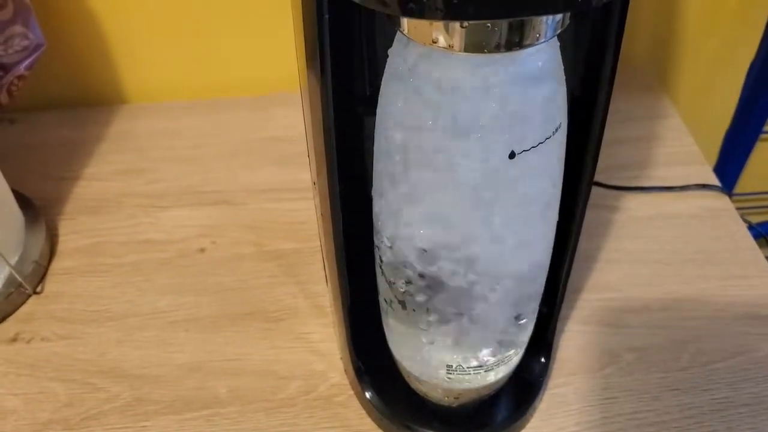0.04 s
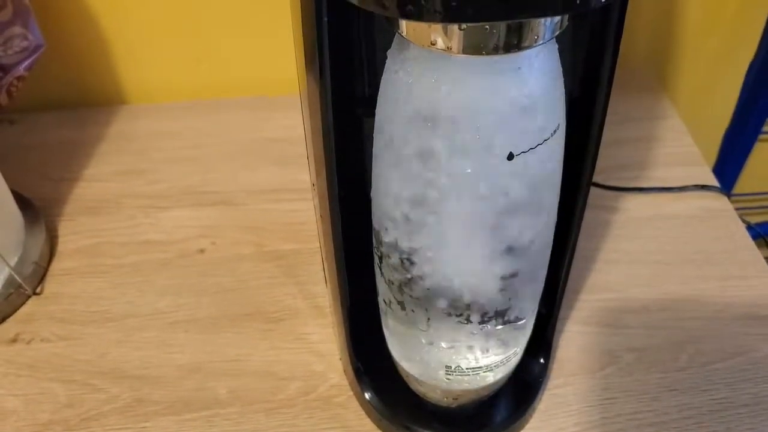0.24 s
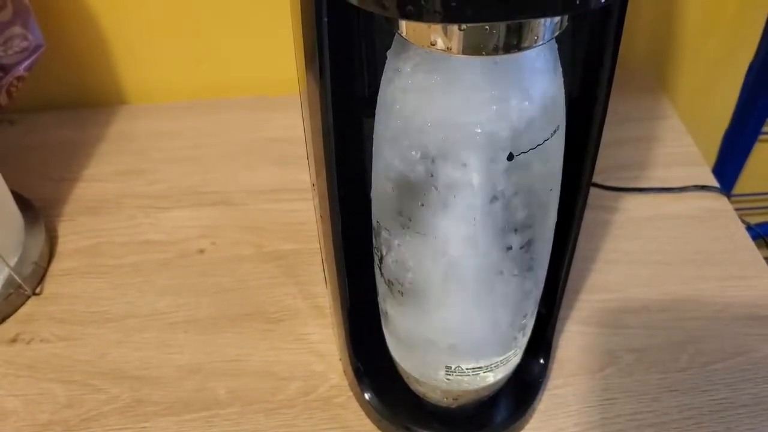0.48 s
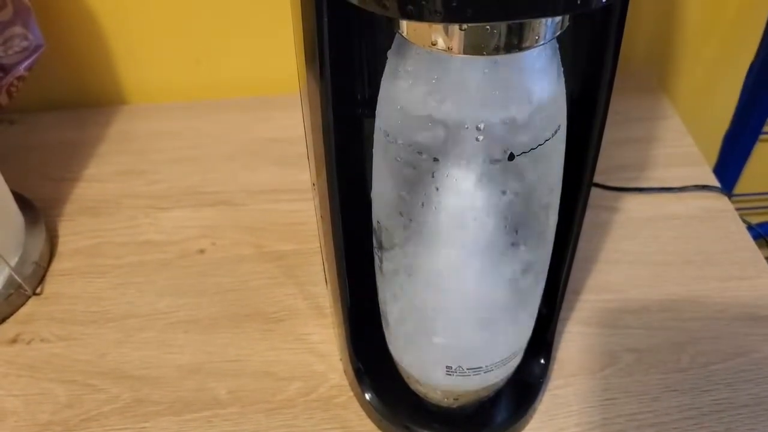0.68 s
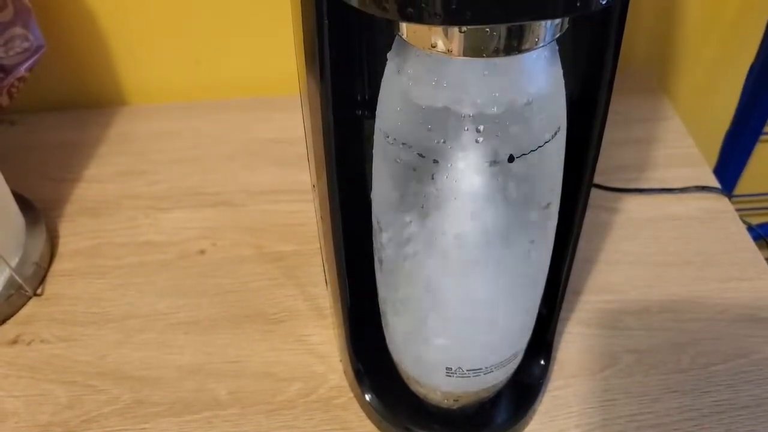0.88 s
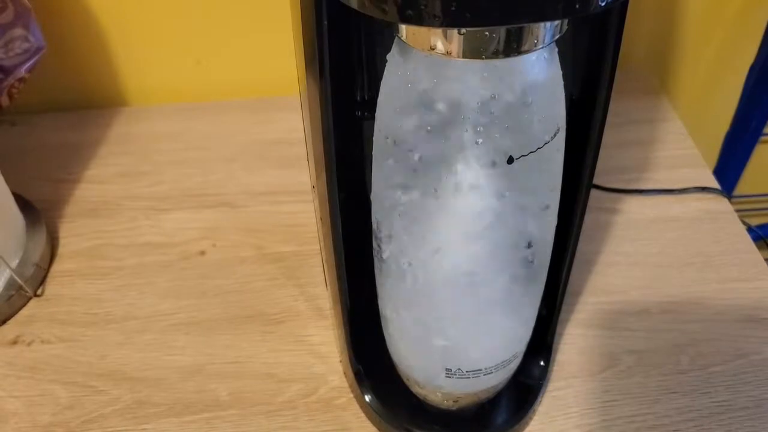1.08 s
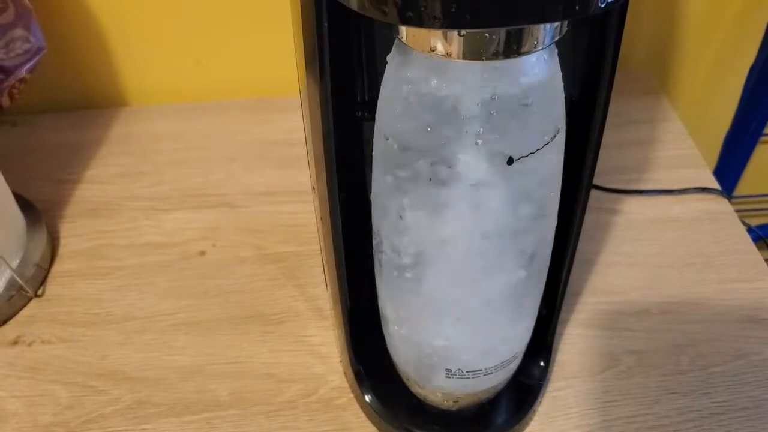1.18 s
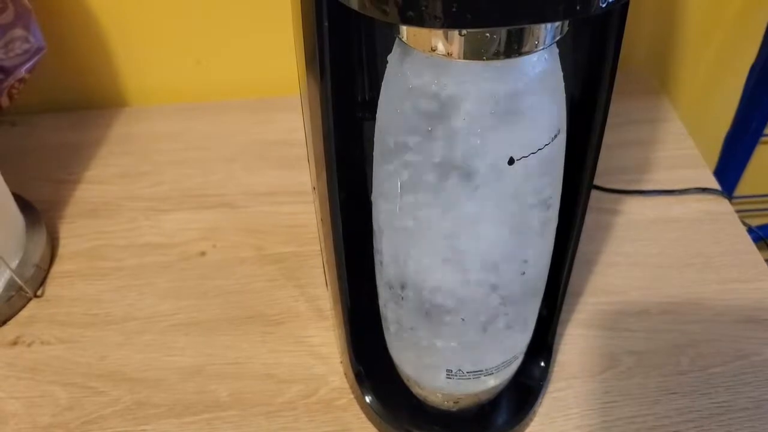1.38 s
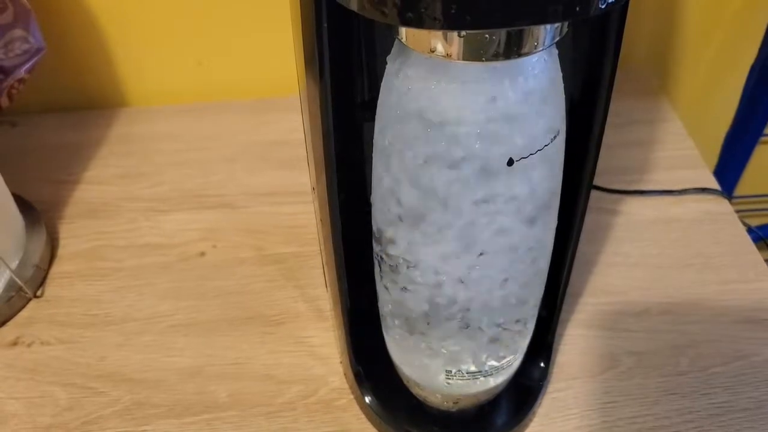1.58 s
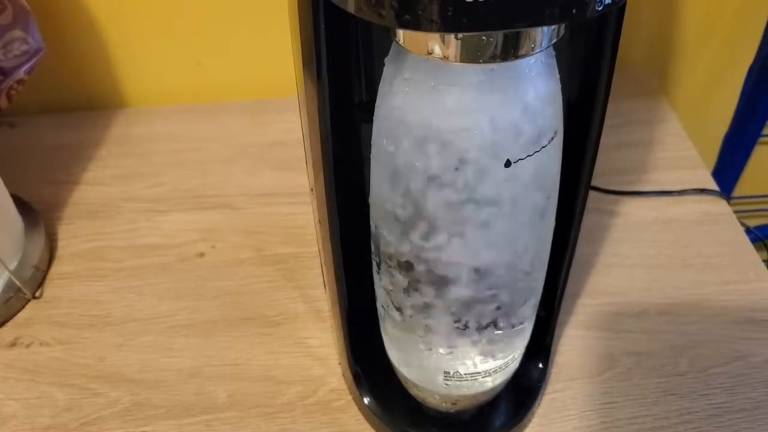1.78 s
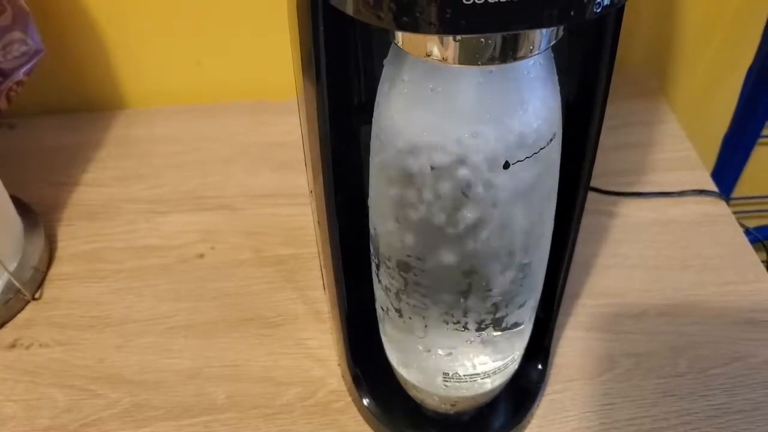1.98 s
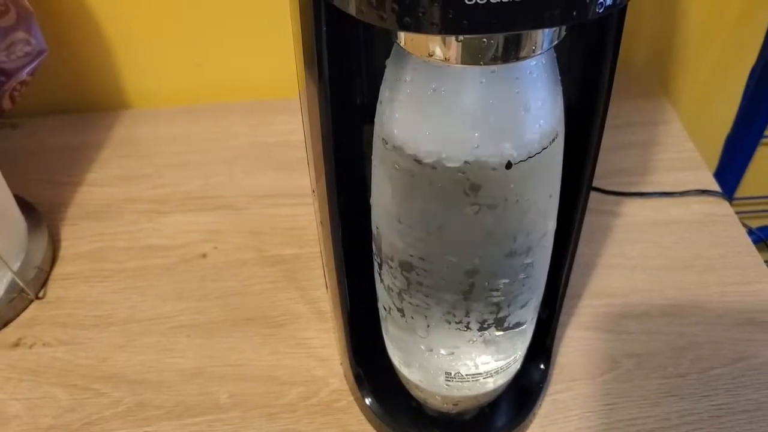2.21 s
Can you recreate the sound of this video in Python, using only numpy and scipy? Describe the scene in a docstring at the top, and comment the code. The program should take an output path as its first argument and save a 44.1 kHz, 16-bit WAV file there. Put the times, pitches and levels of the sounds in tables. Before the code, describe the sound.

Loud hissing gas shoots into a water bottle from a soda maker after a small thump.

```python
"""A kitchen counter: a soda maker carbonates a bottle of water over a low appliance hum.
A valve buzzes as pressure bleeds off, the mechanism thumps, and gas rushes out with thin squeals.
The nozzle fires a shrill jet that churns the water and rings the bottle, then shuts with a soft knock.
A faint leak, a few gurgles and a last chirping puff of gas follow."""
import sys
import numpy as np
from scipy import signal
from scipy.fft import rfft, irfft
from scipy.io import wavfile

SR = 44100
rng = np.random.default_rng(int(sys.argv[2]) if len(sys.argv) > 2 else 0)


def waveform_to_disk(signal):
    """Save audio, clipped to [-1, 1], as 16-bit WAV at the path in sys.argv[1]."""
    frames = np.transpose(np.atleast_2d(signal))
    scaled = np.clip(frames, -1, 1) * 32767
    samples = np.round(scaled).astype(np.int16)
    wavfile.write(sys.argv[1], SR, samples)


N = 99225
T = np.arange(N) / SR
HZ = np.fft.rfftfreq(N, 1 / SR)
JET_ON_S, JET_OFF_S = 0.67, 1.344


def amp(db):
    """Decibels to gain."""
    return 10 ** (np.asarray(db) / 20)


def unit(x):
    """Scale to rms 1."""
    return x / np.sqrt(np.mean(x ** 2) + 1e-20)


def curve(table, hz=HZ, column=1):
    """One table column, interpolated over log frequency."""
    rows = np.array(table, float)
    return np.interp(np.log(hz + 1), np.log(rows[:, 0] + 1), rows[:, column])


def envelope(table):
    """Gain over time from (time [s], level [dB]) rows."""
    return amp(np.interp(T, *np.transpose(table)))


def swell(centre_s, length_s, db):
    """Gaussian bump of gain."""
    return amp(db) * np.exp(-(2 * (T - centre_s) / length_s) ** 2)


def pan(db):
    """Constant-power stereo gains for an L-R level difference."""
    return amp(np.array([[.5], [-.5]]) * db) / np.sqrt((amp(db) + amp(-db)) / 2)


def correlate(stereo, coherence):
    """Blend right into left to make independent channels partly coherent."""
    left, right = stereo
    return np.array([coherence * right + np.sqrt(1 - coherence ** 2) * left, right])


def wander(hz):
    """Random drift of rms 1, low-passed at hz."""
    return unit(irfft(rfft(rng.standard_normal(N)) / (1 + (HZ / hz) ** 4), N))


def white():
    """Stereo white noise."""
    return rng.standard_normal((2, N))


def coloured(drive, colour, image):
    """Give a drive a spectrum and a stereo image; rms 1."""
    spectrum = correlate(rfft(drive), curve(image, column=2))
    return unit(irfft(spectrum * amp(curve(colour)) * pan(curve(image)), N))


def resonant_noise(modes, coherence, left_lead_rad=0):
    """Turbulence in steep resonances; rms 1."""
    power = sum((amp(db) * pan(side_db) / (1 + ((HZ - hz) / (0.67 * width_hz)) ** 2)) ** 2
                for hz, width_hz, db, side_db in modes)
    phase_shift = np.exp(1j * left_lead_rad * np.array([[1], [0]]))
    return unit(irfft(correlate(rfft(white()), coherence) * np.sqrt(power) * phase_shift, N))


def whistles(glides, pitch_waver, rough_db):
    """Short gliding tones, unsteady in pitch and level."""
    out = np.zeros(N)
    for start_s, length_s, from_hz, to_hz, db in glides:
        progress = np.clip((T - start_s) / length_s, 0, 1)
        hz = (from_hz + (to_hz - from_hz) * progress) * (1 + pitch_waver * wander(hz=416))
        gain = amp(db + rough_db * wander(hz=200)) * np.sqrt(2 * abs(np.sin(np.pi * progress)))
        out += gain * np.sin(2 * np.pi * np.cumsum(hz) / SR)
    return out


# (frequency [Hz], level [dB])
HUM_TONES = [(102.8, -60.5), (296, -61)]
# (frequency [Hz], relative density [dB])
AMBIENCE_COLOUR = [(25, -6), (45, -14), (62, 8), (85, 1.5), (140, 4), (300, -3), (450, -6), (700, -11),
                   (1300, -10), (3000, -22), (4600, -14), (6000, -15.5), (7000, -21.5), (15000, -23)]
def kitchen():
    """Low room noise and a wavering appliance hum."""
    hum = sum(amp(db) * np.sqrt(2) * np.sin(2 * np.pi * hz * T + 0.17 * wander(hz=2.4))
              for hz, db in HUM_TONES)
    # (frequency [Hz], L-R [dB], coherence)
    image = [(50, -5, 1), (400, 2, 0.57), (1500, -4, 0), (3470, -4, 0.018), (5140, 6, 0.27),
             (9000, -2, 0)]
    return amp(-52) * coloured(white(), AMBIENCE_COLOUR, image) + hum


# (frequency [Hz], T60 [s])
ROOM_DECAY = [(100, 0.31), (500, 0.16), (2000, 0.16), (9000, 0.15), (16000, 0.31)]
def room_tail(x):
    """Sparse kitchen reflections, each band decaying at its own rate."""
    taps_per_s, predelay_samples = 3000, SR // 250
    taps = rng.choice([-1., 1.], (2, SR // 2)) * (rng.random((2, SR // 2)) < taps_per_s / SR)
    taps[:, :predelay_samples] = 0
    hz, t, bands = signal.stft(correlate(taps, coherence=0.5), SR, nperseg=256)
    decay = amp(-60 * t / curve(ROOM_DECAY, hz)[:, None])
    _, tail = signal.istft(bands * decay, SR, nperseg=256)
    return signal.fftconvolve(x, tail / np.linalg.norm(tail[0]), axes=1)[:, :N]


# (frequency [Hz], width [Hz], relative boost [dB])
CAVITY_MODES = [(1535, 50, 3), (1675, 30, 3), (1857, 45, 4), (1966, 45, 2), (2502, 50, 4), (2750, 70, 3),
                (3340, 110, 3), (4276, 50, 5), (5150, 140, 3), (9060, 110, 2), (9381, 40, 4), (9470, 40, 4),
                (8640, 130, -5), (9680, 120, -6), (9970, 90, -5)]
def cavity(x):
    """Narrow peaks and notches of the space between bottle and housing."""
    boost_db = sum(db / (1 + (2 * (HZ - hz) / width_hz) ** 2) for hz, width_hz, db in CAVITY_MODES)
    return irfft(rfft(x) * amp(boost_db - 1.28), N)


# (frequency [Hz], width [Hz], relative level [dB], L-R [dB])
SEEP_MODES = [(5210, 120, -2.5, 0.5), (9600, 680, -4.5, -17), (11230, 420, -8.5, -4),
              (12440, 350, -2.5, -12), (13000, 400, -5.5, -4)]
def seep():
    """Gas seeps steadily at the seal."""
    return amp(-53) * resonant_noise(SEEP_MODES, coherence=-0.062)


# (centre time [s], length [s], level [dB])
GURGLE_SWELLS = [(1.636, 0.016, -59), (1.841, 0.068, -50), (2.05, 0.16, -55.5)]
def gurgle_gain():
    """Late gurgles, as swells that drive the bottle's ring and the leak."""
    return sum(swell(*row) for row in GURGLE_SWELLS)


# (frequency [Hz], width [Hz], relative level [dB], L-R [dB])
SETTLING_MODES = [(1514, 92, 1, -5.5), (1790, 560, -11.5, 1), (3220, 430, -12.5, -0.5)]
def settling():
    """After the jet, rising bubbles keep the bottle ringing softly."""
    start_db, fall_db_per_s = -51, 10.5
    fade = (T > JET_OFF_S) * amp(start_db - fall_db_per_s * (T - JET_OFF_S))
    return (fade + gurgle_gain()) * resonant_noise(SETTLING_MODES, coherence=0.5)


# (start [s], length [s], from [Hz], to [Hz], level [dB])
PUFF_CHIRPS = [(2.054, 0.036, 1880, 1940, -48), (2.064, 0.038, 2440, 2640, -52),
               (2.09, 0.047, 2700, 2810, -50), (2.106, 0.029, 2520, 2580, -52),
               (2.172, 0.021, 2553, 2900, -44.5), (2.184, 0.021, 2880, 2630, -45),
               (2.215, 0.029, 2670, 2820, -50)]
def chirps():
    """Bubbly chirps glide in the last puff of gas."""
    return whistles(PUFF_CHIRPS, pitch_waver=.015, rough_db=3) * pan(db=-9)


# (start [s], length [s], from [Hz], to [Hz], level [dB])
SEAL_SQUEALS = [(.417, 0.029, 13500, 12400, -43), (.423, .034, 7940, 7140, -43),
                (.416, .022, 5410, 5350, -37.5), (.418, 0.017, 10900, 10000, -45.5),
                (.438, 0.025, 10260, 10150, -45), (.452, 0.044, 5750, 5470, -45),
                (.453, .025, 8470, 8300, -42), (.489, .018, 10350, 10000, -45),
                (.517, 0.046, 8630, 8300, -40), (.575, 0.048, 10500, 9800, -51)]
def squeals():
    """Thin whistles at the seal, each sagging in pitch."""
    return whistles(SEAL_SQUEALS, pitch_waver=.005, rough_db=2.5) * pan(db=-17)


# (harmonic number, relative level [dB])
BUZZ_HARMONICS = [(1, -4.5), (3, -10.5), (5, -8), (6, -7), (9, -6.5), (12, -11.5), (14, -6.5), (15, -0.5),
                  (16, -9), (17, -6), (18, -10), (28, -11), (29, -8)]
# (time [s], level [dB])
BUZZ_ENVELOPE = [(0, -48.5), (.25, -48.5), (.5, -50.5), (.72, -48.5)]
def valve_buzz():
    """The relief valve flutters, briefly faster at the start and after the thump; fades under the jet."""
    rest_hz, jolt_hz, settle_s = 66, 3.8, .062
    stop_s, release_s = 0.824, 0.084
    thump_s = VALVE_KNOCKS[0][0]
    since_jolt_s = np.where(T < thump_s, T + 0.017, T - thump_s)
    hz = (rest_hz + jolt_hz * np.exp(-since_jolt_s / settle_s)) * (1 + 0.0033 * wander(hz=39.9))
    cycles = np.cumsum(hz) / SR
    tone = sum(amp(db) * (1 + .3 * wander(hz=50.7)) * np.sin(2 * np.pi * (k * cycles + rng.random()))
               for k, db in BUZZ_HARMONICS)
    release = np.exp(-np.maximum(T - stop_s, 0) / release_s)
    return np.sqrt(2) * tone * envelope(BUZZ_ENVELOPE) * release * pan(db=-3.5)


# (time [s], level [dB])
BUBBLE_ENVELOPE = [(.4, -68), (.5, -40), (.58, -46.5), (.68, -36.5), (.75, -42), (.87, -36), (.96, -45),
                   (1.12, -48.5), (1.25, -60), (1.47, -63), (1.7, -67), (2.25, -69)]
# (frequency [Hz], relative density [dB])
BUBBLE_COLOUR = [(30, -25.5), (65, -23.5), (110, 3.5), (160, -10), (215, 3.5), (270, -2.5), (400, -5),
                 (530, -9), (650, 0.5), (760, -4.5), (950, 4), (1250, -9.5), (2000, -8), (5000, -38)]
def bubbling():
    """Large bubbles gulp as gas is forced into the bottle."""
    image = [(100, 0.5, 0.93), (620, 0.92, .85), (1200, 0.85, 0.62)]  # (frequency [Hz], L-R [dB], coherence)
    gulps = coloured(white(), BUBBLE_COLOUR, image)
    return gulps * envelope(BUBBLE_ENVELOPE) * amp(1.3 * wander(hz=40))


# (time [s], level [dB])
RUSH_ENVELOPE = [(0, -56), (.038, -53), (.05, -46.5), (.08, -54), (.098, -41), (.132, -44), (.165, -30.5),
                 (.195, -27.5), (.24, -31.5), (.28, -32.5), (.335, -39.5), (.346, -32.5), (.38, -31),
                 (.42, -24.5), (.455, -20.5), (.48, -21), (.505, -22.5), (.58, -24), (.66, -28.5),
                 (.69, -24.5), (.76, -36.5), (.85, -76), (1, -99)]
PUFF_ENVELOPE = [(2.015, -60), (2.032, -48.5), (2.11, -46), (2.15, -48.5), (2.21, -51), (2.25, -63)]
# (frequency [Hz], relative density [dB])
GAS_COLOUR = [(40, -26), (130, -22), (300, -10.5), (530, -24), (750, -21.5), (930, -9.5), (1080, -30),
              (1330, -12), (1600, -12.5), (1900, 0.5), (2100, 1), (2350, -1.5), (2720, 2.5), (3020, -3.5),
              (3400, 1), (3900, -4.5), (4350, -4), (4850, -13), (5400, -13.5), (6100, -19), (7500, -22.5),
              (10000, -27), (13000, -29), (14000, -51)]
# (frequency [Hz], width [Hz], relative level [dB], L-R [dB])
PUFF_MODES = [(2580, 580, 1.5, -7), (3360, 720, -3, -1), (3994, 450, -6, -3)]
# stereo image, shared with knocks and splash (frequency [Hz], L-R [dB], coherence)
MACHINE_IMAGE = [(100, 3, 0.99), (700, 2.5, 0.56), (1300, -6.5, 0.82), (2540, -2.5, 0.25), (4030, -2, 0.32),
                 (5600, 4, 0.12), (8100, -7.5, 0), (15000, -1, 0.092)]
def gas_rush():
    """Gas escapes the valve in uneven swells, sounds the hollow bottle and vents in a last puff."""
    hollow_hz, hollow_width_hz = 1320, 130
    rush = coloured(white(), GAS_COLOUR, MACHINE_IMAGE) * envelope(RUSH_ENVELOPE)
    puff = resonant_noise(PUFF_MODES, coherence=0.19) * envelope(PUFF_ENVELOPE)
    hollow = resonant_noise([(hollow_hz, hollow_width_hz, 0, -5)], coherence=0.98)
    hollow *= swell(centre_s=0.535, length_s=0.27, db=-34.5)
    return (rush + puff + hollow) * amp(1.16 * wander(hz=87))


# thump, two rattles, shut-off (time [s], level [dB], tilt [dB/octave])
VALVE_KNOCKS = [(0.1563, -14.5, 3.5), (0.176, -28, -1), (0.1961, -32, -5), (1.342, -37.5, -9)]
# (frequency [Hz], relative level [dB], T60 [s])
HOUSING_MODES = [(143, -6, 0.038), (212, -15, 0.28), (304, -13, 0.074), (397, 0.5, 0.049), (450, -3, 0.081),
                 (587, -7, 0.049), (946, -6, 0.036), (1170, -7, 0.047), (1568, -6, 0.055),
                 (1856, -9, 0.051)]
def knocks():
    """The valve kicks the housing: a crack, modes that build later the higher they are, a room boom."""
    rise_at_1khz_s, tilt_pivot_hz, low_cut_hz = 0.0037, 397, 97
    crack_db, crack_s = -7, 0.0044
    boom_db, boom_rise_s, boom_t60_s, boom_width_hz = -11.5, 0.018, 0.28, 190
    # (frequency [Hz], relative density [dB])
    crack_colour = [(60, -12), (400, 5), (1600, -2.5), (3000, -27), (12000, -29)]
    out = np.zeros((2, N))
    for start_s, db, tilt_db in VALVE_KNOCKS:
        t = np.maximum(T - start_s, 0)
        boom_modes = []
        for hz, mode_db, t60_s in HOUSING_MODES:
            tilted_db = mode_db + tilt_db * np.log2(hz / tilt_pivot_hz)
            rise = 1 - np.exp(-t / (rise_at_1khz_s * (hz / 1000) ** 2))
            ring = rise * amp(-60 * t / t60_s) * np.sin(2 * np.pi * hz * t)
            out += amp(db + tilted_db) * pan(db=-1.8 * np.log2(hz / 500)) * ring
            boom_modes.append((hz, boom_width_hz, tilted_db, 0))
        crack = coloured(white(), crack_colour, MACHINE_IMAGE)
        out += amp(db + crack_db) * crack * t / crack_s * np.exp(1 - t / crack_s)
        boom = resonant_noise(boom_modes, coherence=0.66)
        out += amp(db + boom_db) * boom * (1 - np.exp(-t / boom_rise_s)) * amp(-60 * t / boom_t60_s)
    return signal.sosfilt(signal.butter(2, low_cut_hz, "high", fs=SR, output="sos"), out)


# (time [s], level [dB])
CHURN_ENVELOPE = [(0, -55), (.4, -47.5), (.6, -38.5), (.7, -30), (.772, -26), (.784, -23.5), (.832, -27),
                  (.88, -25), (.97, -26.5), (1.09, -28), (1.2, -32), (1.25, -36.5), (1.342, -37.5),
                  (1.358, -48), (1.5, -67), (2.25, -55.5)]
# (frequency [Hz], relative density [dB])
WATER_COLOUR = [(30, -34), (90, -27), (220, -14), (420, -9.5), (540, -16), (700, -6.5), (1000, -0.5),
                (1200, 0.5), (1700, 0.5), (2400, 0), (3500, -2), (4700, -4.5), (6200, -1.5), (8000, -22),
                (15000, -17)]
# (frequency [Hz], width [Hz], relative level [dB], L-R [dB])
BOTTLE_MODES = [(1524, 87, -6, -5), (1620, 150, -14, -5), (1845, 140, -6, -4.5), (1966, 210, -7.5, 0),
                (3400, 210, -18.5, -1)]
def churn():
    """Bursting bubbles splash and ring the gas space of the bottle."""
    pops_per_s, splash_db, flutter_db = 2500, -2.5, 2
    pops = white() * (rng.random(N) < pops_per_s / SR)
    pops *= amp(-0.5 * np.minimum(rng.exponential(1, N), 4))
    splash = coloured(unit(pops) + 0.63 * white(), WATER_COLOUR, MACHINE_IMAGE)
    ring = np.zeros((2, N))
    for hz, width_hz, db, side_db in BOTTLE_MODES:
        mode = resonant_noise([(hz, width_hz, 0, side_db)], coherence=0.76)
        ring += mode * amp(db + flutter_db * wander(hz=44))
    return envelope(CHURN_ENVELOPE) * (ring + amp(splash_db) * splash)


# (frequency [Hz], width [Hz], early gain [dB], settled gain [dB], L-R [dB], left lead [rad])
NOZZLE_MODES = [(8400, 300, -26, -16, -13, 4.5), (8940, 320, -4.5, -6.5, -14, 2),
                (9243, 320, -5, -8, -11, -2), (9475, 92, -6, -4.5, -7, -1.5),
                (9960, 190, -8.5, -14, -16, -0.2), (10010, 300, -18, -10.5, -20, -5),
                (11370, 200, -15.5, -22, -6, -1.7), (12400, 540, -21, -14, -6.5, 3),
                (12950, 450, -18, -17, -4, 5)]
# (frequency [Hz], relative density [dB])
JET_HISS_COLOUR = [(2000, -12.5), (3300, -4), (4700, 1), (5200, -2), (5700, 5), (6200, 1.5), (7400, 2),
                   (9500, 10.5), (11000, 5), (13000, -1), (13700, -0.5), (15800, 0)]
# (frequency [Hz], L-R [dB], coherence)
JET_HISS_IMAGE = [(2000, -12, 0.33), (4180, 1, 0.13), (5170, 1.5, 0.14), (6560, 3, 0.0029),
                  (7600, -3, 0.11), (8500, -17, 0.036), (15000, -2, 0.0038)]
# (time [s], level re open nozzle [dB])
LEAK_ENVELOPE = [(0, -32), (.4, -27), (.66, -23.5), (1.35, -21), (1.5, -21), (1.7, -23.5), (2, -27),
                 (2.25, -26.5)]
def jet():
    """The open nozzle shrieks over a broad hiss, its resonances shifting in balance; shut, it leaks."""
    attack_s, release_s, settle_at_s, settle_span_s = 0.0058, 0.0008, 0.9, 0.03
    shriek_db, shriek_arch_db, hiss_db, hiss_arch_db = -24, 1.5, -32.5, 7.5
    gate = np.clip((T - JET_ON_S) / attack_s, 0, 1) * np.exp(-np.maximum(T - JET_OFF_S, 0) / release_s)
    flow = gate + envelope(LEAK_ENVELOPE) + amp(5) * gurgle_gain()
    progress = np.clip((T - JET_ON_S) / (JET_OFF_S - JET_ON_S), 0, 1)
    arch = np.sin(np.pi * progress ** 0.74) ** 2
    flutter_db = 1.13 * wander(hz=68.6)
    settled = .5 + .5 * np.tanh((T - settle_at_s) / settle_span_s)
    shriek = np.zeros((2, N))
    for hz, width_hz, early_db, settled_db, side_db, lead_rad in NOZZLE_MODES:
        mode = resonant_noise([(hz, width_hz, 0, side_db)], coherence=0.68, left_lead_rad=lead_rad)
        shriek += mode * amp(early_db + (settled_db - early_db) * settled)
    shriek *= amp(shriek_db + shriek_arch_db * arch + flutter_db)
    hiss = coloured(white(), JET_HISS_COLOUR, JET_HISS_IMAGE)
    hiss *= amp(hiss_db + hiss_arch_db * arch + 0.33 * flutter_db)
    return flow * (shriek + hiss)


def scene():
    """Gas and water through cavity and room, plus bubbling, mechanism and background."""
    fizz = cavity(gas_rush() + jet() + churn() + settling() + seep()) + squeals() + chirps()
    return fizz + amp(-8.5) * room_tail(fizz) + bubbling() + valve_buzz() + knocks() + kitchen()


def record(dry):
    """Steep low-pass band limit."""
    cutoff_hz = 15900
    lowpass = signal.firwin(511, cutoff_hz, window=("kaiser", 9), fs=SR)
    return signal.oaconvolve(dry, lowpass[None], "same")


dry = scene()
out = record(dry)
waveform_to_disk(out)
```